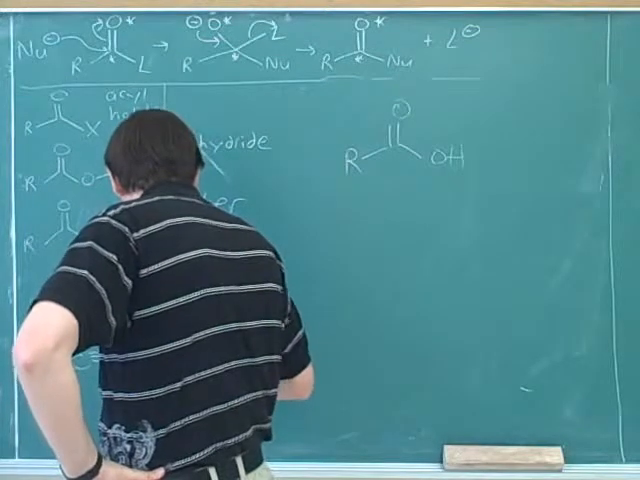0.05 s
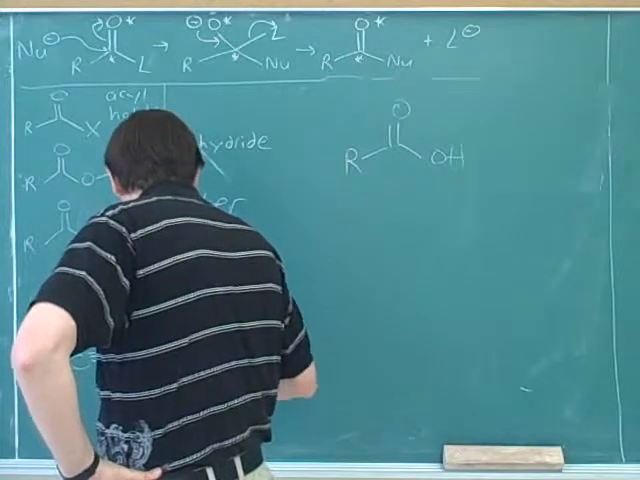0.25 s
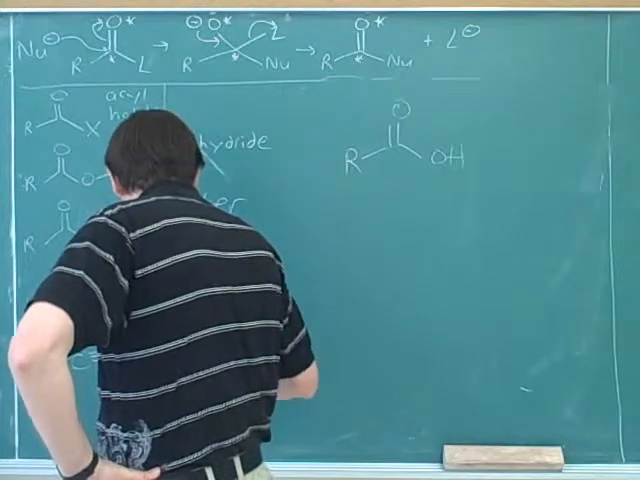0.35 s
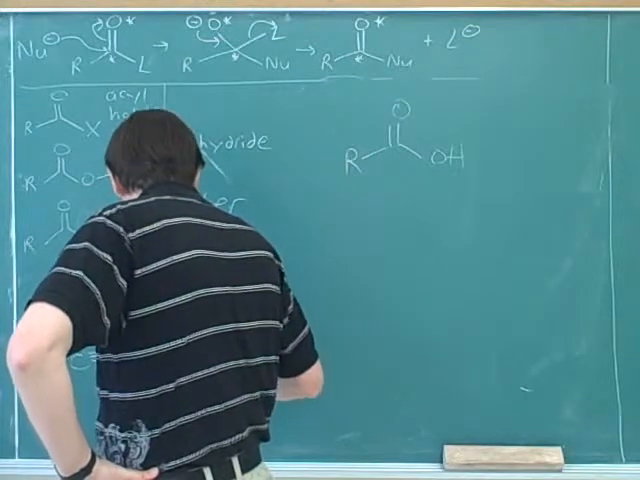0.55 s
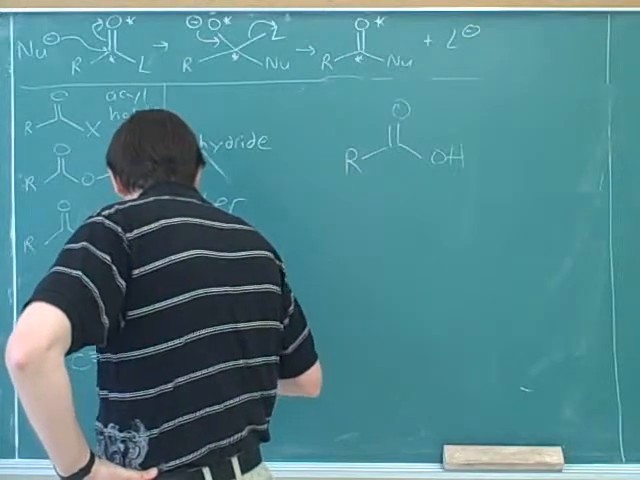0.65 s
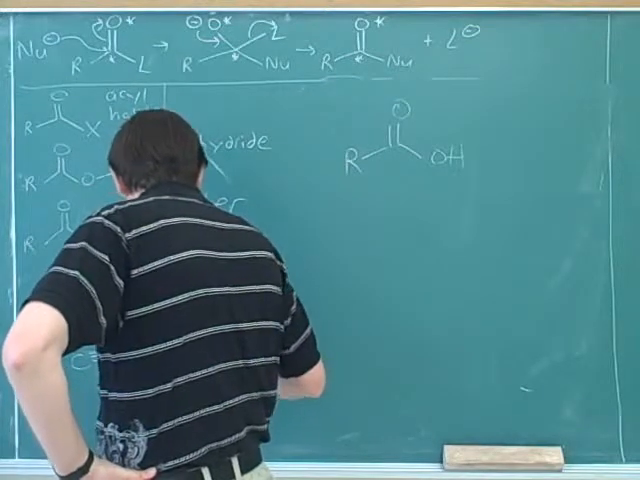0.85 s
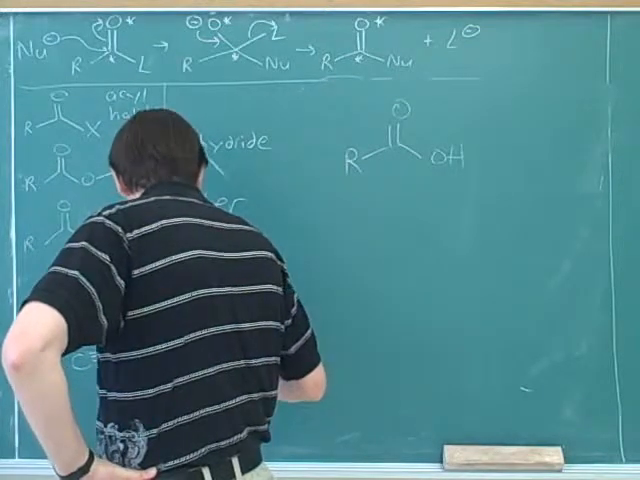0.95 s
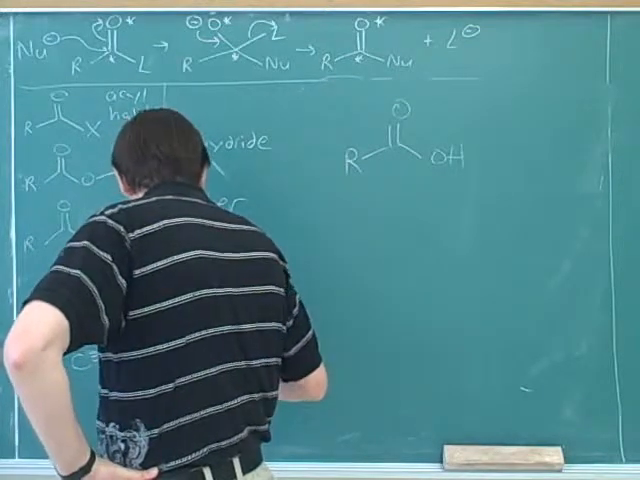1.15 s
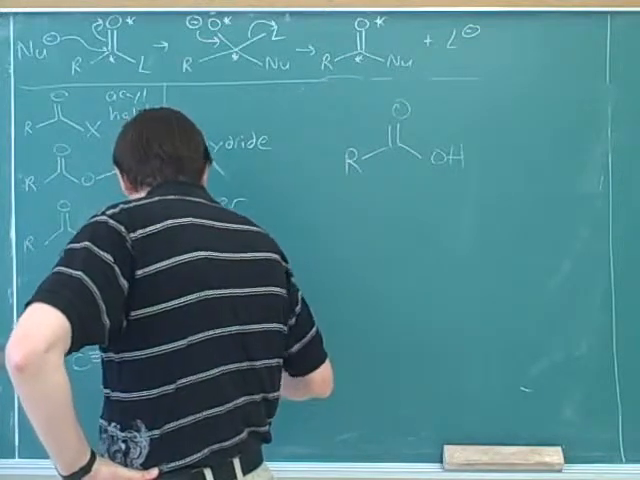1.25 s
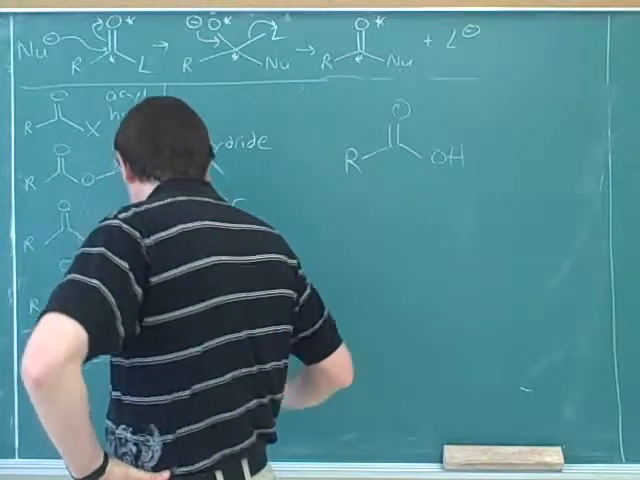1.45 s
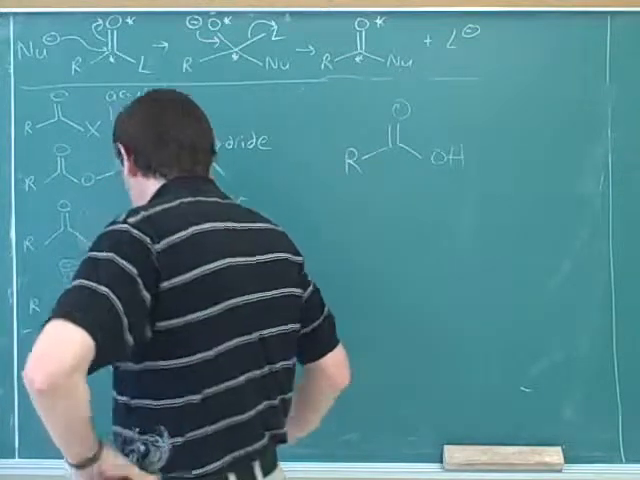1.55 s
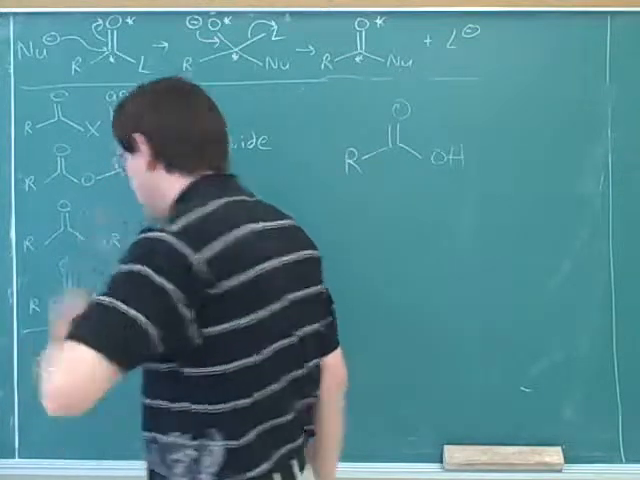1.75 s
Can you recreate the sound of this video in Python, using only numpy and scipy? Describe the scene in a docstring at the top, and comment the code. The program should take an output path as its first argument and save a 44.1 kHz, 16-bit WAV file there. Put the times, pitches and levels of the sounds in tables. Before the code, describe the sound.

Chalk taps six times on a classroom chalkboard over low rumbling ventilation.

```python
"""Six short taps of chalk on a wall chalkboard in a bare classroom, over rumbling ventilation.
First come the tail of an earlier tap and a faint drag of the chalk. Two taps follow, each a sharp knock,
a bright spray from the ringing panel and a soft thud of the whole board, thrown back by the walls.
The chalk drags again, grazes the board and lands four more times; a last faint drag ends the scene."""
import sys
import numpy as np
from scipy import signal
from scipy.fft import rfft, irfft
from scipy.io import wavfile

SR = 44100
rng = np.random.default_rng(int(sys.argv[2]) if len(sys.argv) > 2 else 0)


def dump_mix(stems):
    """Bounce the given channels to the path in sys.argv[1] as a 16-bit WAV at rate SR."""
    frames = np.atleast_2d(stems).T  # one column per channel
    limited = np.clip(frames, -1, 1)  # hard clip at full scale
    pcm = np.round(limited * 32767).astype(np.int16)
    wavfile.write(sys.argv[1], SR, pcm)


N = 79380
SIZE = 32768  # samples per impulse response
HZ = np.fft.rfftfreq(SIZE, 1 / SR)
T = np.arange(SIZE) / SR


def amp(db):
    """Decibels to gain."""
    return 10 ** (np.asarray(db) / 20)


def curve(points, hz):
    """Interpolates (frequency, value) rows on a log-frequency axis."""
    point_hz, value = np.transpose(points)
    return np.interp(np.log(hz + 1), np.log(point_hz + 1), value)


def unit(x):
    """Scales to energy 1."""
    return x / (np.linalg.norm(x) + 1e-20)


def fade(t, t60):
    """Exponential decay, 60 dB per t60."""
    return np.exp(-np.log(1000) * t / t60)


def add(mix, start_s, sound):
    """Mixes a sound in at start_s, which may be negative."""
    at = round(start_s * SR)
    sound = sound[max(-at, 0):]
    part = mix[max(at, 0):][:len(sound)]
    part += sound[:len(part)]


def colour(x, gain_db):
    """Minimum-phase filter; gain given on HZ."""
    cepstrum = irfft(np.log(amp(gain_db)))
    cepstrum[1:SIZE // 2] *= 2
    cepstrum[SIZE // 2 + 1:] = 0
    return irfft(rfft(x, SIZE) * np.exp(rfft(cepstrum)))


def noise(spectrum):
    """Steady shaped noise, rms 1."""
    gain = amp(curve(spectrum, np.fft.rfftfreq(N, 1 / SR)))
    return unit(irfft(rfft(rng.standard_normal(N)) * gain, N)) * np.sqrt(N)


def scatter():
    """Dense random arrivals, near-flat spectrum."""
    bins = signal.stft(rng.standard_normal(SIZE), nperseg=256)[2]
    return signal.istft(bins / (abs(bins) + 1e-12), nperseg=256)[1][:SIZE]


def burst(decay_s):
    """Decaying scatter, energy 1."""
    return unit(scatter() * np.exp(-T / decay_s))


def cut_bass(x, cutoff_hz=398):
    """High-pass for the early sound: the panel radiates little bass."""
    return signal.lfilter(*signal.butter(1, cutoff_hz, "high", fs=SR), x)


# Ventilation spectrum (frequency [Hz], relative level [dB])
VENT_SPECTRUM = [(20, -3.5), (40, -0.5), (60, -1), (125, -2.5), (190, -6), (330, -14.5), (450, -17),
                 (700, -24), (1100, -26.5), (1500, -31), (2400, -34.5), (4800, -40), (7000, -41),
                 (16000, -43.5)]


def ventilation(rms_db=-48):
    """Low rumble with a little hiss."""
    return amp(rms_db) * noise(VENT_SPECTRUM)


# Room decay (frequency [Hz], t60 [s])
ROOM_T60 = [(100, 0.81), (450, 0.95), (1200, 0.45), (2400, 0.48), (5000, 0.49), (12000, 0.33)]


def room_tail(level_db=-3.5, rise_s=0.0082):
    """Reverberation builds up in the bare room; low tones last longest."""
    hz, t, bins = signal.stft(scatter(), SR, nperseg=256)
    t60_s = curve(ROOM_T60, hz)[:, None]
    tail = signal.istft(bins * fade(t, t60_s), SR, nperseg=256)[1][:SIZE]
    rise = 1 - np.exp(-(T / rise_s) ** 2)
    return amp(level_db) * unit(tail * rise)


# Far-wall echo spectrum (frequency [Hz], gain [dB])
WALL_SPECTRUM = [(200, -34), (900, 1), (2000, -7), (5000, 7.5), (7500, 0), (15000, -5)]


def wall_echo(gain_db=-13, spread_s=0.013):
    """Smeared, bright reflection from the far wall."""
    return amp(gain_db) * colour(burst(spread_s), curve(WALL_SPECTRUM, HZ))


# Sliding-chalk spectrum (frequency [Hz], relative level [dB])
DRAG_SPECTRUM = [(800, -43), (3000, -3), (7000, 1), (11000, -4), (16000, -3.5)]
# Drags (centre time [s], 1/e half length [s], top rms level [dB])
DRAG_SWELLS = [(0.022, 0.073, -62), (0.558, 0.1, -60.5), (1.547, 0.082, -62)]


def chalk_drags():
    """Thin hiss swells and fades as the chalk slides."""
    t = np.arange(N) / SR
    swells = sum(amp(db) * np.exp(-((t - centre_s) / half_s) ** 2) for centre_s, half_s, db in DRAG_SWELLS)
    return noise(DRAG_SPECTRUM) * swells


# Whole-board modes (frequency [Hz], t60 [s], level [dB])
THUD_MODES = [(29.7, 0.21, -43), (49.2, 0.21, -34.5), (75.2, 0.2, -37.5), (119.8, 0.52, -47)]


def board_thud(rise_s=0.0028):
    """The whole board swings on its mounts."""
    swing = sum(amp(db) * fade(T, t60) * np.sin(2 * np.pi * hz * T) for hz, t60, db in THUD_MODES)
    return swing * (1 - np.exp(-T / rise_s))


# Panel bending waves (frequency [Hz], arrival [s], 1/e decay [s], gain [dB])
BENDING_WAVES = [(10800, .002, 0.0011, -6.5), (6660, .0029, 0.0012, -1.5), (2440, .0058, 0.0049, -8),
                 (1210, .0085, 0.0092, -10.5)]


def panel_spray(ring_db=-3.5, rise_s=0.0043, t60_s=0.066, width_oct=0.33):
    """The panel rings briefly; its bending waves arrive treble first."""
    rise = 1 - np.exp(-T / rise_s)
    out = amp(ring_db) * unit(scatter() * rise * fade(T, t60_s))
    for hz, arrival_s, decay_s, db in BENDING_WAVES:
        band_db = np.maximum(-6 * (np.log2((HZ + 1) / hz) / width_oct) ** 2, -40)
        add(out, arrival_s, amp(db) * colour(burst(decay_s), band_db))
    return out


def ringing(wall_delay_s=0.054):
    """Diffuse response to one touch: panel, far wall, room."""
    early = panel_spray()
    add(early, wall_delay_s, wall_echo())
    return cut_bass(early) + room_tail()


# Reflections from nearby surfaces (delay [s], gain [linear])
NEAR_ECHOES = [(.0015, 0.09), (.0057, 0.27), (.0089, -.19), (.0095, .23), (0.0171, 0.093), (0.0238, 0.12)]


def knock(direct_gain=0.32, corner_hz=3600, treble_floor=0.33):
    """Direct click and first echoes, top treble shelved down."""
    echoes = np.zeros(SIZE)
    for delay_s, gain in NEAR_ECHOES:
        add(echoes, delay_s, np.array([gain]))
    lowpass = 1 / np.sqrt(1 + (HZ / corner_hz) ** 4)
    shelf_db = 20 * np.log10(np.maximum(lowpass, treble_floor))
    return colour(direct_gain * (T == 0) + cut_bass(echoes), shelf_db)


# Grazes (time [s], band centre [Hz], level re touch_db [dB])
GRAZE_HITS = [(.7638, 5500, -32.5), (.771, 3600, -21)]


def chalk_grazes(click, ring, touch_db, width_oct=0.95, ring_gain=0.14):
    """Light touches just before the chalk lands."""
    out = np.zeros(N)
    for start_s, hz, db in GRAZE_HITS:
        band_db = -10 * np.log10(1 + (np.log2((HZ + 1) / hz) / width_oct) ** 4)
        add(out, start_s, colour(click + ring_gain * ring, band_db + touch_db + db))
    return out


# Tap spectrum (frequency [Hz], gain [dB])
TAP_SPECTRUM = [(60, -7.5), (200, 0.5), (420, -8), (640, -6), (1080, -0.5), (1550, -3.5), (2400, -1.5),
                (2950, -6.5), (3500, -6), (4800, -14), (5500, -13), (6300, -13.5), (7500, -15), (8500, -19),
                (10000, -22), (15500, -24.5)]
# Board resonances (frequency [Hz], width [Hz], lift [dB])
BOARD_MODES = [(386, 21.5, 7.5), (437, 72, 6), (540, 62, 6), (755, 26, 4.5), (895, 27, 2.5), (965, 15, 2.5),
               (1022, 67, 5.5), (1184, 115, 6), (1288, 62, 1), (1418, 44, 5), (1634, 86, 2),
               (1788, 93, 4.5), (2000, 44, 4.5), (2100, 180, 4.5), (2320, 80, 4), (2700, 46, 1),
               (2820, 31, 0.5), (3325, 130, 2.5), (3970, 55, 3), (4490, 17, 8), (4500, 17, 2.5),
               (5500, 340, 1.5), (6870, 220, 2), (7740, 200, 2)]
# Tint bands (frequency [Hz])
TINT_HZ = [500, 1200, 2400, 4100, 7000, 12500]
# Taps, tinted by the chalk's force and angle; the grip tunes the stick's resonance
# (time [s], thud gain [dB], stick resonance [Hz], stick lift [dB], tint at each TINT_HZ [dB])
TAP_HITS = [(-.15, 2, 2500, 0, 0.48, 0.5, -5, -14.5, -2, -8),
            (.2054, -1.5, 2540, 5.5, 1, -1.1, 2, 10.5, 7, 7.5),
            (0.4123, -3, 2100, 0.5, -1.7, -4.5, -5, -7, -4, -4),
            (.784, 3.5, 5740, 1.5, -0.21, -1.2, -1, -3, 2.5, -1),
            (0.9588, 2.5, 2550, 2, 0.37, -0.3, -0.2, -0.5, -2.3, -4),
            (1.1166, 3.5, 1300, 0, -1, -2, -3, -8, -6, -3.5),
            (1.3315, 1, 4250, 2, -.4, -1.2, 2.3, 2, 0.2, -0.5)]


def chalk_taps(click, ring, touch_db, shared_power=0.63, stick_width_oct=0.21, thud_delay_s=0.02655):
    """Each tap rings the same board and room from a slightly different spot."""
    out = np.zeros(N)
    modes_db = sum(db / (1 + (2 * (HZ - hz) / width_hz) ** 2) for hz, width_hz, db in BOARD_MODES)
    board_db = curve(TAP_SPECTRUM, HZ) + modes_db + touch_db
    for start_s, thud_db, stick_hz, lift_db, *tint in TAP_HITS:
        response = click + np.sqrt(shared_power) * ring + np.sqrt(1 - shared_power) * ringing()
        stick_db = lift_db * np.exp(-(np.log2((HZ + 1) / stick_hz) / stick_width_oct) ** 2)
        tint_db = curve(list(zip(TINT_HZ, tint)), HZ)
        add(out, start_s, colour(response, board_db + stick_db + tint_db))
        add(out, start_s + thud_delay_s, amp(thud_db) * board_thud())
    return out


def scene(touch_db=9.5):
    """Chalk, board and room in mono."""
    click, ring = knock(), ringing()
    touches = chalk_taps(click, ring, touch_db) + chalk_grazes(click, ring, touch_db)
    return (touches + chalk_drags() + ventilation())[None]


def record(dry):
    """Steep low-pass at 15780 Hz."""
    lowpass = signal.firwin(401, 15780, window=("kaiser", 8), fs=SR)
    return signal.oaconvolve(dry, lowpass[None], "same")


dry = scene()
out = record(dry)
dump_mix(out)
```